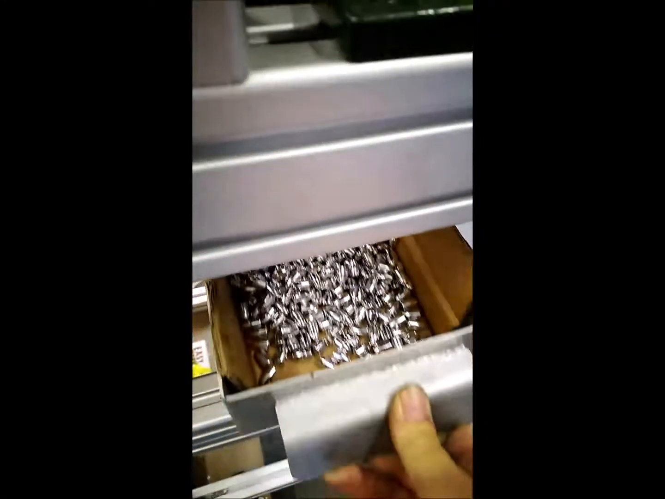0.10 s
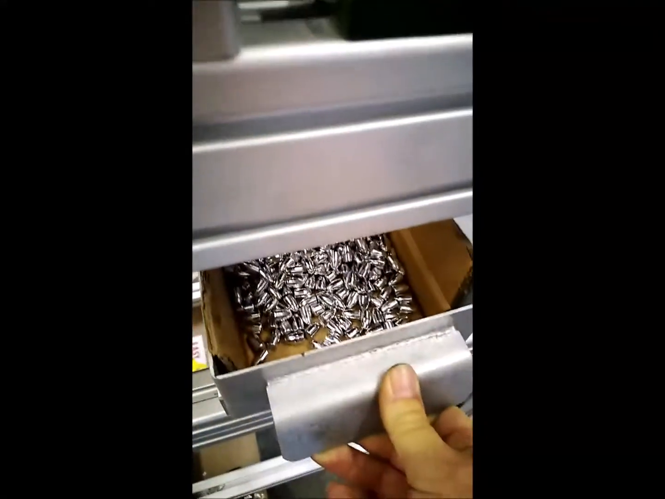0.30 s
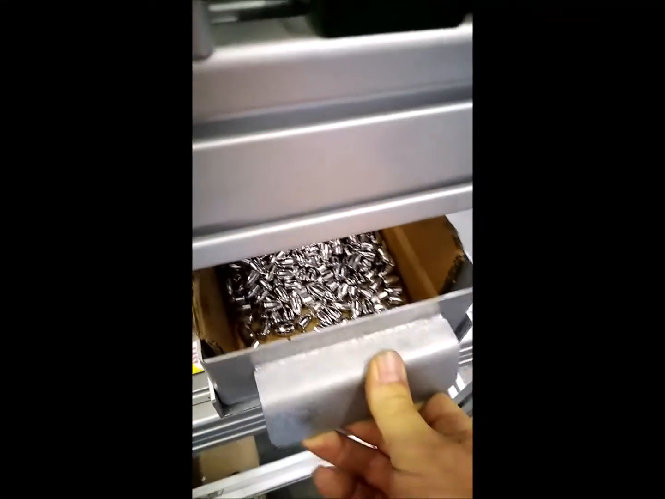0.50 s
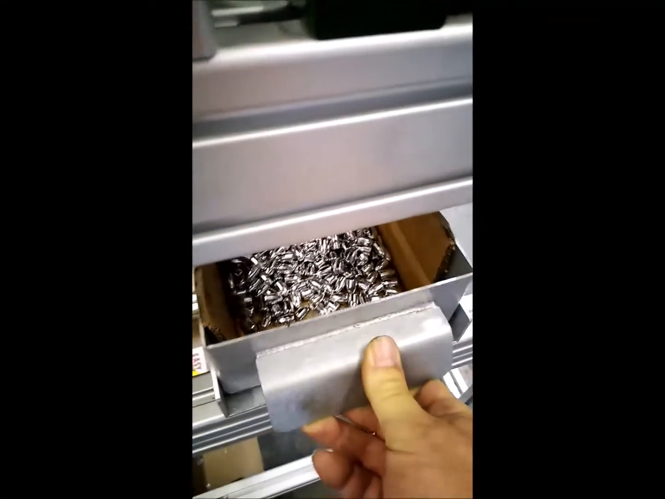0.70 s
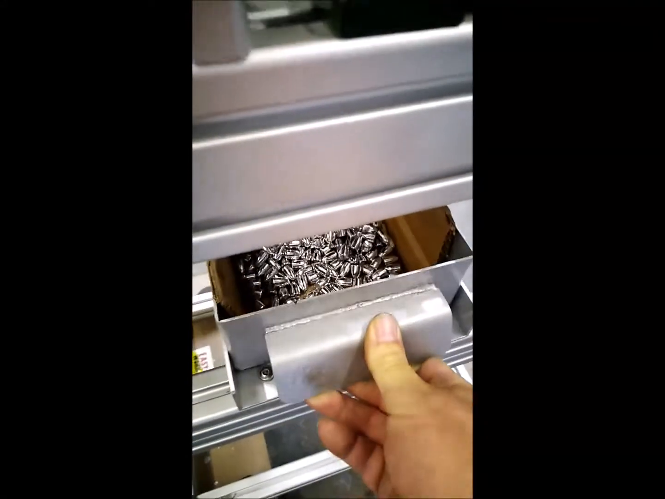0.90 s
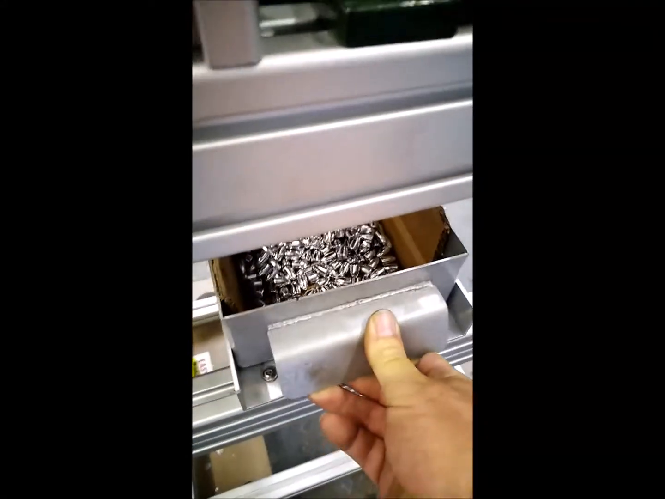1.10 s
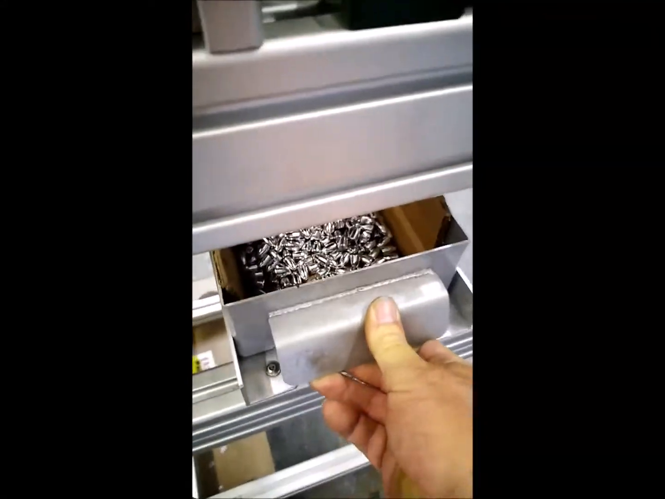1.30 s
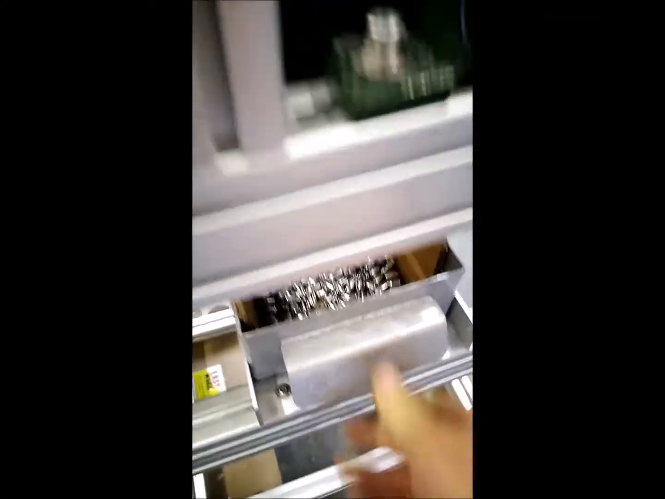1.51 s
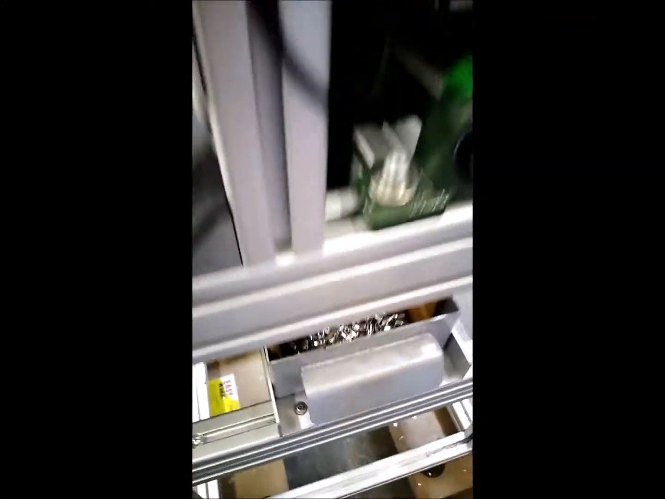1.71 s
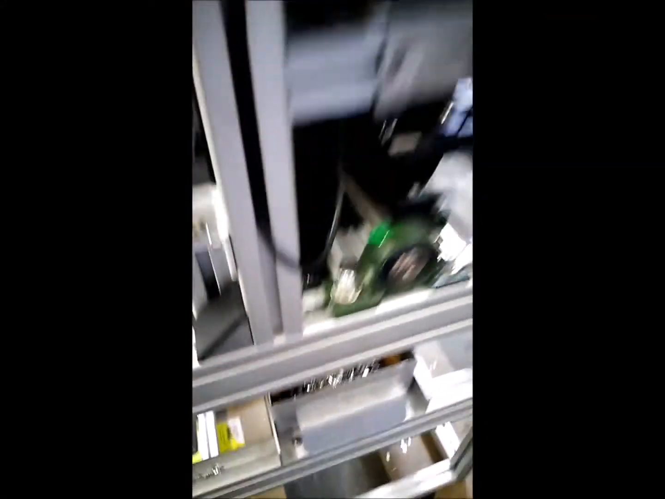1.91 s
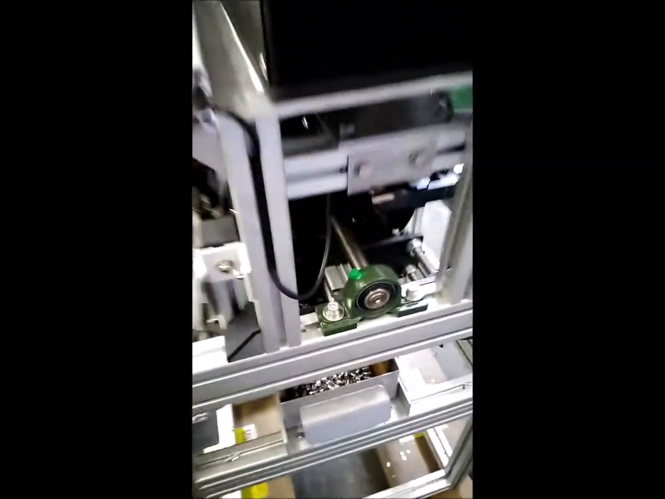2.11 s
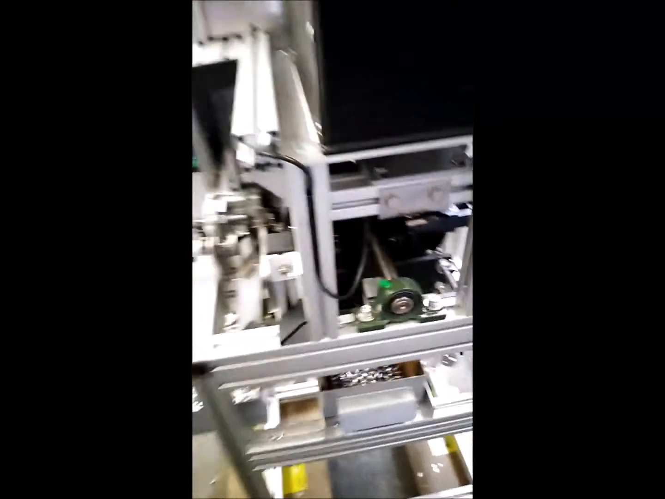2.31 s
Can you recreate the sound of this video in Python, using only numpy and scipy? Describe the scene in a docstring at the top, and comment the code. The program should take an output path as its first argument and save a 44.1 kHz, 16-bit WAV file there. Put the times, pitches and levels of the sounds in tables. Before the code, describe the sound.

Machine cycle close up: spitting valves, clanking slides, ringing steel and dull knocks over motor whine

```python
"""Automatic machine in a workshop

A machine cycles between hard walls, close to a phone: bursts of air and clanks from noise of four colours,
struck parts, panel and frame from damped modes, a squeak from a rising tone. A motor whines, a parts drawer
rumbles, the workshop hushes; decaying noise is the hall. Two unlike ports hear it all and peaks clip."""
import sys
import numpy as np
from scipy import signal
from scipy.fft import rfft, irfft, next_fast_len
from scipy.io import wavfile
from scipy.ndimage import map_coordinates

SR = 44100
rng = np.random.default_rng(int(sys.argv[2]) if len(sys.argv) > 2 else 0)


def inscribe(sig):
    """Save sig as 16-bit PCM at rate SR to the path in sys.argv[1].

    A 1-D sig is mono; a 2-D sig holds one channel per row.
    Samples are clipped to [-1, 1] before scaling.
    """
    pcm = np.round(np.clip(np.atleast_2d(sig).T, -1, 1) * 32767)
    wavfile.write(sys.argv[1], SR, pcm.astype(np.int16))


N = 108045
SCATTER_DB = 2  # spread of mode levels from blow to blow


def amp(db):
    """Amplitude factor of a level in dB."""
    return 10 ** (np.asarray(db) / 20)


def unit(x):
    """x scaled to rms 1."""
    return x / np.sqrt(np.mean(x ** 2) + 1e-20)


def along(points, hz):
    """Values at hz from (Hz, value) points on a log axis."""
    f, v = np.transpose(points)
    return np.interp(np.log(hz + 1), np.log(f + 1), v)


def wobble(knots_per_s):
    """A smooth random curve through normal knots."""
    knots = rng.standard_normal(int(N * knots_per_s / SR) + 4)
    return map_coordinates(knots, [np.arange(N) * knots_per_s / SR])


def filtered(x, response):
    """x times a response of frequency."""
    m = next_fast_len(x.shape[-1] + 8192)
    spectrum = rfft(x, m) * response(np.fft.rfftfreq(m, 1 / SR))
    return irfft(spectrum, m)[..., :x.shape[-1]]


def add(track, start_s, sound):
    """Mix a sound in at start_s, cut at the track's end."""
    part = track[..., round(start_s * SR):]
    part[..., :sound.shape[-1]] += sound[..., :part.shape[-1]]


RING_RISE_S = 0.0011


def ring(modes):
    """Damped modes (Hz, dB, t60 s) after one blow, one row each, 1 s long."""
    t = np.arange(SR) / SR
    hz, db, t60_s = np.transpose(modes)[:, :, None]
    decay = amp(db - 60 * t / t60_s)
    return decay * np.sin(2 * np.pi * hz * t) * (1 - np.exp(-t / RING_RISE_S))


# Likeness of left and right noise. Each row: frequency in Hz, correlation.
LIKENESS = [(60, 1), (180, 1), (540, 0.69), (1620, 0.18), (4880, -0.017), (14600, -0.044)]


def rush(colour, size=N):
    """Stereo noise of rms 1; mid and side shares set how alike the ports hear each frequency."""
    def mid_side(hz):
        turn = np.arccos(np.clip(along(LIKENESS, hz), -1, 1)) / 2
        return amp(along(colour, hz)) * [np.cos(turn), np.sin(turn)]

    mid, side = filtered(rng.standard_normal((2, size)), mid_side)
    return unit(np.array([mid + side, mid - side]))


# Workshop hush. Each row: frequency in Hz, relative density in dB per Hz.
HUSH_COLOUR = [(25, -21), (290, -22), (515, -32), (650, -38), (820, -5), (1050, -12), (1300, -6.5),
               (1750, -12.5), (2500, -8), (3200, -17.5), (5140, -17), (8000, -8.5), (10000, -23),
               (15000, -60)]
HUSH_DB = -40


def hush():
    """Steady coloured noise of the workshop."""
    return amp(HUSH_DB) * rush(HUSH_COLOUR)


# Whine level: steady, fading late, partly returning. Each row: time in seconds, level in dB.
WHINE_LEVEL = [(0, -38.5), (.3, -36), (1.1, -36), (1.4, -35), (1.8, -42.5), (2.2, -54), (2.45, -47.5)]
WHINE_HZ, WHINE_WAVER_DB, WHINE_WAVER_RAD = 817.5, .8, 0.27


def motor_whine():
    """One motor tone, wavering in level and phase."""
    t = np.arange(N) / SR
    level_db = np.interp(t, *np.transpose(WHINE_LEVEL)) + WHINE_WAVER_DB * wobble(10.2)
    return amp(level_db) * np.sin(2 * np.pi * WHINE_HZ * t + WHINE_WAVER_RAD * wobble(7.4))


# Drawer rumble. Each row: time in seconds, level in dB.
DRAWER_LEVEL = [(0, -34), (.05, -37.5), (.085, -34.5), (.13, -36.5), (.18, -43.5), (0.232, -34.5),
                (.3, -56), (.4, -70)]
# Drawer runners. Each row: frequency in Hz, relative density in dB per Hz.
RUNNER_COLOUR = [(250, -56), (380, -14), (450, -7), (510, 6), (570, -12.5), (660, 3), (760, -10),
                 (900, -21), (1000, -48), (1300, -88)]
DRAWER_WAVER_DB = 3.9


def drawer_rumble():
    """The drawer's runners sound as unevenly swelling low noise."""
    s, db = np.transpose(DRAWER_LEVEL)
    level_db = np.interp(np.arange(N) / SR, s, db, right=-120) + DRAWER_WAVER_DB * wobble(68.0)
    return amp(level_db) * rush(RUNNER_COLOUR)


# Frame thumps. Each row: start in seconds, level in dB.
THUMP_TIMES = [(0.871, -33.5), (1.47, -25.5), (1.931, -13.5), (1.942, -11.5)]
# Frame mode frequencies in Hz.
FRAME_MODE_HZ = [155, 178, 215, 280, 318, 435, 500]
# Frame modes. Each row: relative level in dB, t60 in seconds.
FRAME_MODES = [(-3, 0.79), (-0.5, 0.61), (-5.5, 0.23), (8, 0.053), (-22, 0.1), (-15.5, 0.43), (-17, 0.41)]


def thumps():
    """The frame booms in its low damped modes."""
    out = np.zeros(N)
    boom = ring(np.column_stack([FRAME_MODE_HZ, FRAME_MODES])).sum(0)
    for start_s, db in THUMP_TIMES:
        add(out, start_s, amp(db) * boom)
    return out


# Dull knocks. Each row: start in seconds, level in dB, boost of the top mode in dB.
KNOCK_TIMES = [(1.417, -26, -6), (1.425, -17, -13), (1.492, -12.5, -11), (1.825, -12, -12), (1.873, -15, 7),
               (1.878, -15, -3), (1.885, -19, -6), (1.894, -13.5, -4), (1.903, -18.5, 4), (1.911, -25, 0),
               (1.917, -13.5, -10), (1.924, -14.5, -2), (1.931, -14, -6), (2.026, -16.5, -7),
               (2.08, -21, 0)]
# Panel modes. Each row: frequency in Hz, relative level in dB, t60 in seconds.
PANEL_MODES = [(630, -33, 0.08), (694, 3, 0.026), (765, -0.5, 0.043), (1057, -12, 0.057), (1414, -3, 0.032)]


def knocks():
    """Blows on a panel, its short modes scattered in level at each."""
    out, modes = np.zeros(N), ring(PANEL_MODES)
    for start_s, db, top_db in KNOCK_TIMES:
        levels_db = db + SCATTER_DB * rng.standard_normal(len(PANEL_MODES))
        levels_db[-1] += top_db
        add(out, start_s, amp(levels_db) @ modes)
    return out


# Slide squeak: frequencies at start and end in Hz.
SQUEAK_SWEEP_HZ = [1450, 1870]
SQUEAK_START_S, SQUEAK_LENGTH_S, SQUEAK_DB = .444, .025, -7


def squeak():
    """A slide squeaks as a brief rising tone."""
    out, u = np.zeros(N), np.linspace(0, 1, round(SQUEAK_LENGTH_S * SR))
    phase = 2 * np.pi * np.cumsum(np.interp(u, [0, 1], SQUEAK_SWEEP_HZ)) / SR
    swell = np.sin(np.pi * u ** 2)
    add(out, SQUEAK_START_S, amp(SQUEAK_DB) * swell * np.sin(phase))
    return out


# Loose parts. Each row: start in seconds, frequency in Hz, level in dB, t60 in seconds.
PING_NOTES = [(.112, 1645, -34.5, 0.13), (.305, 2153, -11, 0.093), (.301, 534, -7.5, 0.053),
              (.301, 384, -12.5, 0.045), (.301, 936, -14.5, 0.062), (.455, 819, -13.5, 0.2),
              (.72, 327.5, -18, 0.16), (.712, 6680, -11, 0.36), (.85, 698, -23, .25),
              (1.008, 1214, -24, .25), (1.42, 1885, -19.5, .08), (2.065, 291, -23, 0.16),
              (2.083, 2313, -21, 0.21), (2.18, 274, -22.5, 0.16), (.825, 2094, -16, 0.28),
              (.84, 1943, -25, 1.2), ]


def pings():
    """Loose parts ring, each on one damped mode."""
    out = np.zeros(N)
    for start_s, *mode in PING_NOTES:
        add(out, start_s, ring([mode])[0])
    return out


# Blows on steel. Each row: start in seconds, level in dB.
STEEL_STRIKES = [(.2498, -44), (.382, -31), (.453, -38), (.7154, -22), (.7803, -9.5), (1.4591, -43),
                 (1.6866, -19), (2.0817, -19.5)]
# Steel mode frequencies in Hz.
STEEL_MODE_HZ = [4861, 5771, 6679, 6885, 7266, 7753, 8136, 8867, 9174]
# Steel modes. Each row: relative level in dB, t60 in seconds.
STEEL_MODES = [(-8, .35), (-6, .25), (-12, .4), (-8, .6), (-6, .5), (0, .3), (-10, .2), (-9, .5), (-7, .6)]


def steel():
    """A struck steel part rings in thin high lines, level and sign random at each port."""
    out, modes = np.zeros((2, N)), ring(np.column_stack([STEEL_MODE_HZ, STEEL_MODES]))
    shape = (2, len(STEEL_MODES))
    for start_s, db in STEEL_STRIKES:
        levels = amp(db + SCATTER_DB * rng.standard_normal(shape))
        add(out, start_s, levels * rng.choice([-1, 1], shape) @ modes)
    return out


# Small parts: lowest and highest frequency in Hz.
CLINK_RANGE_HZ = [1000, 2800]
CLINK_COUNT, CLINK_T60_S = 500, .04


def clinks():
    """Small parts knock together: short rings at random, a few much louder; rms 1."""
    out, t = np.zeros((2, N)), np.arange(round(CLINK_T60_S * SR)) / SR
    low_hz, high_hz = CLINK_RANGE_HZ
    for when, pitch, size, pan in rng.random((CLINK_COUNT, 4)):
        hz = low_hz * (high_hz / low_hz) ** pitch
        sides = np.array([[pan], [1 - pan]]) / (0.12 + size)
        add(out, when * N / SR, sides * amp(-60 * t / CLINK_T60_S) * np.sin(2 * np.pi * hz * t))
    return unit(out)


# Bursts. Each row: start in seconds, relative hiss level in dB, clank, clatter and rumble over hiss in dB,
# left over right in dB, t60 in seconds, share to the walls over direct in dB.
BURST_ROWS = [(0.1106, -25.5, -2, 2, -38.5, -5, 0.08, -4.5), (0.193, -17, -6, -21, -40, -2.5, 0.093, 5.5),
              (0.2135, -21.5, -4, -0.5, -26, -11, 0.041, 7.5),
              (0.2304, -20.5, -10, -17, -15.5, 2, 0.061, 14.5),
              (0.245, -15.5, 3, -27, -11, -22, 0.053, -1.5), (0.2494, -3, -2, -7, -24, -1.5, 0.041, -4.5),
              (0.2985, -11, 6, 1, -0.5, -5.5, 0.062, -4), (0.31, -15.5, 8.5, -1, -5, 8, 0.075, -14),
              (0.3194, -7, -1, -19, -26, -8, 0.064, -30), (0.3742, -9, 1.5, -1.5, -12, -3.5, 0.11, -2),
              (0.383, 3.5, -5, -40, -25, -6.5, 0.11, 0), (0.439, -2, -14, -32, -16, 2, 0.14, -1),
              (0.453, -3, 4.5, -9.5, -29, -1.5, 0.078, -2.5), (0.609, -22.5, 0, 6.5, -12, -6, 0.078, -3),
              (0.663, -19, 7, 3, -0.5, -2, 0.066, 2), (0.6931, 5, -14.5, -43, -25, -2.5, 0.16, 1),
              (0.7134, -5.5, 0.5, -6, -18, -5.5, 0.17, -3.5),
              (0.7812, 2.5, -14.5, -31, -28, -7, 0.089, -1.5),
              (0.8124, -7.5, -11.5, -11, -22.5, 3, 0.097, 5), (0.8285, -16.5, 1.5, -6.5, -19, -6, 0.17, 5),
              (0.901, -31, 3.5, 14, 8, -3, 0.13, -3.5), (1.007, -35, 10.5, 8, 11.5, -0.5, 0.16, -4),
              (1.4137, -3.5, -15.5, -11, -39, 1.5, 0.063, 3.5), (1.423, -13.5, -7, -11, -6, -5, 0.21, -8.5),
              (1.4364, -3, -6.5, -32, -27, -4, 0.16, -1),
              (1.4574, 0.5, -15.5, -18.5, -18.5, -2.5, 0.17, -1),
              (1.6855, 3.5, -13.5, -41, -33, -6, 0.11, -4), (1.708, -8.5, -9.5, -36, -21, 5.5, 0.15, -4.5),
              (1.758, -14, -31, -23.5, -23.5, -1, 0.44, -1.5),
              (1.822, -13, -12.5, -11.5, -13.5, -1, 0.23, 1), (1.8718, -19, -4, -5.5, -15, -2, 0.16, 6.5),
              (1.927, -2.5, -7, -21, -5.5, -5, 0.077, -0.5), (1.956, -13.5, -29, -9, -5.5, -3, 0.092, 5),
              (2.0282, -12, -24, -38, -14, -0.5, 0.46, 4.5), (2.073, -9.5, -3, -34, -21, -10, 0.25, -35),
              (2.0808, -1, -5.5, -13, -20, -1.5, 0.092, -2.5)]
# Noise colours. Each row: frequency in Hz, relative density in dB per Hz.
HISS_COLOUR = [(2300, -34.5), (3000, -18), (4120, -9.5), (5500, -10.5), (6700, -4.5), (7200, -0.5),
               (7750, 1.5), (8300, -0.5), (9170, -5), (12100, -17), (13700, -22.5), (15000, -69)]
CLANK_COLOUR = [(700, -28.5), (1000, -9.5), (1400, -7), (2000, -3.5), (2600, -3.5), (3100, -11.5),
                (4500, -37)]
CLATTER_COLOUR = [(200, -25), (350, -4), (550, -3.5), (780, 4.5), (1000, -9.5), (1400, -65)]
RUMBLE_COLOUR = [(25, -12), (70, -8.5), (150, -0.5), (250, 2), (350, -3.5), (550, -28)]
# Attack time constants in seconds: hiss, clank, clatter, rumble.
NOISE_RISE_S = [.001, .002, .004, .006]
GRIT_DB, GRIT_KNOTS_PER_S = 2.5, 300
CLINK_DB = -5.5  # over the clank noise


def bursts():
    """Valves spit and slides clank: four gritty noises with one decay; returns direct and wall-bound parts."""
    power = np.zeros((2, 4, 2, N))  # path, noise, port, time
    t = np.arange(SR // 3) / SR
    rise = 1 - np.exp(-t / np.array(NOISE_RISE_S)[:, None, None])
    for start_s, hiss_db, *over_db, pan_db, t60_s, wall_db in BURST_ROWS:
        sides = amp([[pan_db / 2], [-pan_db / 2]])
        shape = amp(hiss_db - 60 * t / t60_s) * rise * sides
        paths = amp([0, wall_db])[:, None, None, None]
        noises = amp([0, *over_db])[:, None, None]
        add(power, start_s, (paths * noises * shape / 2) ** 2)  # overlaps add in power
    colours = HISS_COLOUR, CLANK_COLOUR, CLATTER_COLOUR, RUMBLE_COLOUR
    layers = [amp(GRIT_DB * wobble(GRIT_KNOTS_PER_S)) * rush(colour) for colour in colours]
    layers[1] = unit(layers[1] + amp(CLINK_DB) * clinks())
    return (np.sqrt(power) * layers).sum(1)


# Hall decay. Each row: frequency in Hz, t60 in seconds.
HALL_T60 = [(100, 1.16), (200, 0.83), (350, 0.97), (500, 0.69), (680, 0.63), (820, 1.12), (1050, 0.98),
            (1400, 1.52), (2000, 1.15), (5000, 1.2), (9000, 0.81), (13000, 0.49)]
# Hall level. Each row: frequency in Hz, level over the sound sent in, in dB.
HALL_LEVEL = [(60, 3.5), (150, 10.5), (300, 9), (600, 10.5), (1000, 6), (2500, 4.5), (4500, 1),
              (7000, -1.5), (13000, -8)]
HALL_DELAY_S = .008


def hall(x):
    """Walls answer with noise decaying per frequency; a new tail for each third of a second."""
    out, step = np.zeros((2, N)), SR // 3
    noise = rush([(20, 0), (20000, 0)], size=8 * SR).reshape(2, 8, SR)
    hz, t, z = signal.stft(noise, SR, nperseg=512)
    t60_s = along(HALL_T60, hz)[:, None]
    decay = amp(along(HALL_LEVEL, hz)[:, None] - 60 * t / t60_s)
    decay = decay / np.sqrt(t60_s * SR / np.log(1e6))  # energy independent of t60
    tails = signal.istft(z * decay, SR, nperseg=512)[1]
    for k in range(8):
        piece = x[:, k * step:][:, :step]
        add(out, k * step / SR + HALL_DELAY_S, signal.fftconvolve(piece, tails[:, k], axes=1))
    return out


LEFT_LAG_S = .0001


def at_ports(x):
    """A mono sound at two ports, the left one later."""
    sides = np.array([[1], [-1]])
    return filtered(x, lambda hz: np.exp(-1j * np.pi * hz * LEFT_LAG_S * sides))


BLOWS_HALL_DB, THUMP_HALL_DB = -17.5, -21.5  # sends to the hall; low, so the beating of the thumps stays clear


def scene():
    """Background, direct machine sounds and the hall's answer."""
    background = hush() + motor_whine() + drawer_rumble()
    booms = at_ports(thumps())
    hits = at_ports(knocks() + squeak() + pings())
    air, wall_bound = bursts()
    echo = hall(wall_bound + amp(BLOWS_HALL_DB) * hits + amp(THUMP_HALL_DB) * booms)
    return background + booms + hits + steel() + air + echo


# Unlike ports. Each row: frequency in Hz, left over right in dB.
PORT_TILT = [(60, -6.5), (150, 0), (370, 0.5), (940, 2), (2340, 9.5), (5860, 0.5), (14600, 6.5)]
BASS_CUT_HZ, TOP_HZ, CLIP_HARDNESS = 83, 15240, 14


def record(dry):
    """Two ports of unlike colour and thin bass, peaks clipped near full scale, a band limit."""
    def ports(hz):
        bass_cut = (1j * hz / (BASS_CUT_HZ + 1j * hz)) ** 2
        return amp(along(PORT_TILT, hz) * [[.5], [-.5]]) * bass_cut

    x = filtered(dry, ports)
    x = x / (1 + np.abs(x) ** CLIP_HARDNESS) ** (1 / CLIP_HARDNESS)
    return filtered(x, lambda hz: hz < TOP_HZ)


dry = scene()
out = record(dry)
inscribe(out)
```